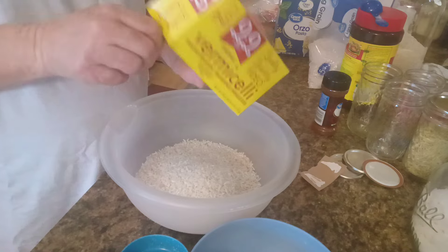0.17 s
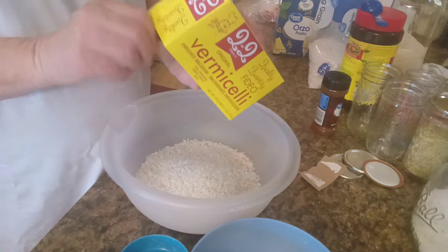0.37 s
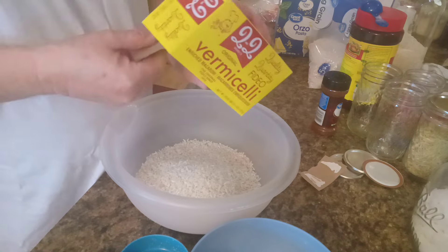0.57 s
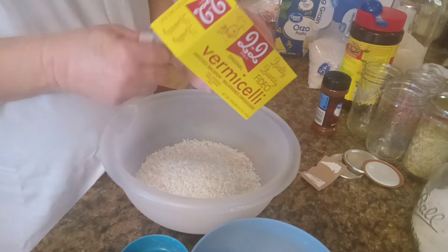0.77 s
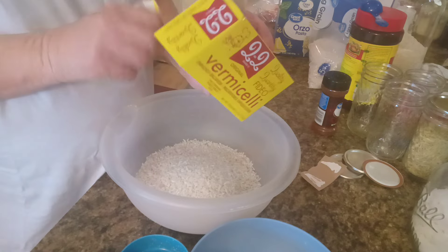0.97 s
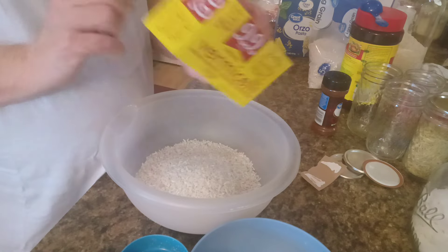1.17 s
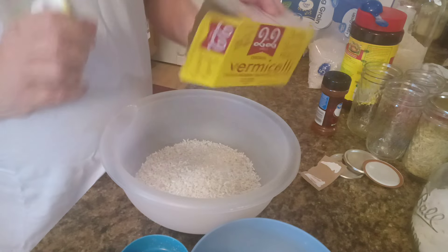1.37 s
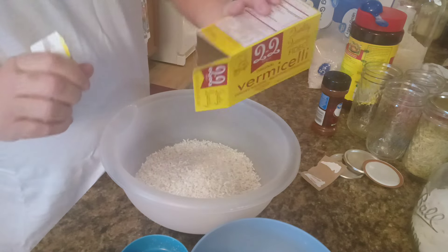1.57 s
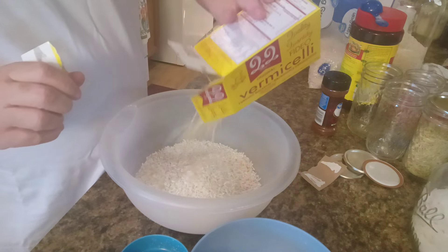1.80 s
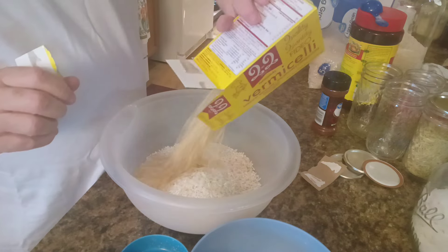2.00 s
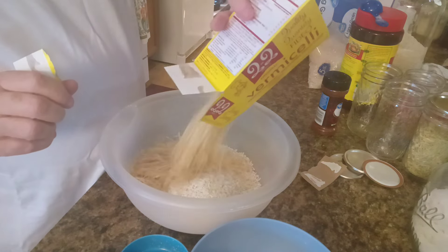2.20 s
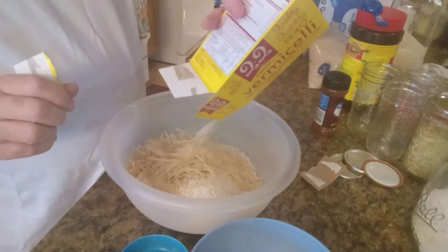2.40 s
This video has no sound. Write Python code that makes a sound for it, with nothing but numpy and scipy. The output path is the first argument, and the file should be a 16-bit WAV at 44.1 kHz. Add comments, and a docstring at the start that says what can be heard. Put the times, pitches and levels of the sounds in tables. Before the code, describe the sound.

Dry pasta pours from a carton onto a heap in a bowl, rattling briskly then thinning

```python
"""Dry pasta poured into a bowl

Short dry pasta is poured from a cardboard box onto a growing heap of pasta in a bowl, in a small kitchen,
over rumble and hum. Fingers rub, flap squeaks and jolts come first; then clumps knock, and the slide thins
to a patter on the heap. Coloured noise grains make the pasta and rubs, decaying modes the box wall,
unsteady sines the squeaks. Two spaced microphones hear it with their own lags, echoes and colours.
"""
import sys
import numpy as np
from scipy import signal
from scipy.fft import rfft, irfft
from scipy.io import wavfile
from scipy.ndimage import uniform_filter1d

SR = 44100
rng = np.random.default_rng(int(sys.argv[2]) if len(sys.argv) > 2 else 0)


def transcribe(signal):
    """Save signal, clipped to [-1, 1], as a 16-bit WAV file at the path in sys.argv[1]."""
    frames = np.atleast_2d(signal).T
    limited = np.clip(frames, -1, 1)
    pcm = np.round(limited * 32767).astype(np.int16)
    wavfile.write(sys.argv[1], SR, pcm)


N = 107956
T = np.arange(N) / SR

# colour of pasta against the box [f/Hz, level/dB]
BOX_TINT = [(100, -29.5), (230, -17), (300, -13.5), (480, -9), (650, 0.5), (810, 5.5), (1000, 1.5),
            (1150, 0.5), (1400, 1), (1700, -1), (2200, -1.5), (2550, 0), (2950, -2.5), (3700, 0),
            (4300, -1.5), (4700, -2.5), (6500, -2), (7700, -7.5), (9000, -13), (12000, -21), (15500, -45)]

JOLT_PER_S, BUMPS_PER_S = 3500, 800
UNEVEN_DB, UNEVEN_S = 0.4, 0.003  # slight unevenness of the flow: spread, averaging time
PLACES = 5
LEFT_LAG_S, BOWL_LAG_S, LAG_SPREAD_S = 0.0009363, 0.001133, 0.00016
EARLY_DB, EARLY_T60_S, EARLY_LOW_HZ = -3.5, 0.021, 735
ROOM_DB, ROOM_T60_S, ROOM_DAMP_HZ = -8.5, 0.19, 7040


def amp(db):
    """Decibels to gain."""
    return 10 ** (np.asarray(db) / 20)


def curve(rows):
    """Gain over time from (t/s, level/dB) points, -120 dB before the first."""
    s, db = np.array(rows).T
    return amp(np.interp(T, s, db, left=-120))


def unit(x):
    """Scale to an energy of one."""
    return x / np.sqrt(np.sum(x ** 2) + 1e-18)


def ring(x, impulse):
    """Convolve a signal, or each row of several, with an impulse response."""
    return signal.oaconvolve(np.atleast_2d(x), np.atleast_2d(impulse), axes=1)[:, :N]


def response(points, size=2048):
    """Minimum-phase impulse response of an (f/Hz, level/dB) colour, by folding its cepstrum."""
    hz, db = np.array(points, float).T
    f = np.maximum(np.fft.rfftfreq(size, 1 / SR), 1)
    gain = amp(np.interp(np.log(f), np.log(hz), db))
    cepstrum = irfft(np.log(gain))
    cepstrum[1:size // 2] *= 2
    cepstrum[size // 2 + 1:] = 0
    return irfft(np.exp(rfft(cepstrum)))


def tint(x, points):
    """Colour a signal with a unit-energy filter, which keeps the power of white noise."""
    return ring(x, unit(response(points)))


def strew(x, colour):
    """Give each sample, hence each impact, one of several places, and colour them all."""
    chosen = rng.integers(0, PLACES, N) == np.arange(PLACES)[:, None]
    return tint(x * chosen, colour)


def grains(per_s, scatter_db):
    """Random tiny impacts of uneven size and either sign, rms one."""
    hit = rng.random(N) < per_s / SR
    size = amp(scatter_db * np.clip(rng.standard_normal(N), -2, 2))
    return unit(hit * size * rng.choice([-1, 1], N)) * np.sqrt(N)


def burst(x, envelope):
    """Shape a train of impacts, keeping the energy of the envelope."""
    return unit(x * envelope) * np.sqrt(np.sum(envelope ** 2))


def swell(middle, half):
    """Smooth Gaussian rise and fall."""
    return np.exp(-((T - middle) / half) ** 2)


def blow(start, attack, decay):
    """Linear rise, exponential fall."""
    age = np.maximum(T - start, 0)
    return np.minimum(age / attack, 1) * np.exp(-np.maximum(age - attack, 0) / decay)


def wander(seconds):
    """Noise averaged over the given time, rms one."""
    noise = rng.standard_normal(N)
    return unit(uniform_filter1d(noise, max(int(seconds * SR), 1))) * np.sqrt(N)


def flutter(depth_db, seconds):
    """Unsteady gain of rms one."""
    return unit(amp(depth_db * wander(seconds))) * np.sqrt(N)


def floor():
    """Low room rumble, partly shared by both channels, with an appliance hum as a sine."""
    # colour of the rumble [f/Hz, level/dB]
    rumble_colour = [(25, -5), (50, -13), (75, 0), (110, -2), (180, 7), (300, -7), (600, -12), (2000, -20),
                     (4500, -9.5), (8000, -35), (15000, -52)]
    # common level of rumble and hum [t/s, level/dB]
    floor_level = [(0, -61.5), (.5, -60.5), (.65, -58.5), (1.5, -50.5), (2.2, -61), (2.45, -63.5)]
    hum_hz, hum_db = 76.2, -6.5  # peak, relative to the common level
    shared, *separate = tint(rng.standard_normal((3, N)), rumble_colour)
    hum = amp(hum_db) * np.sin(2 * np.pi * hum_hz * T)
    return (0.62 * shared + 0.5 * np.array(separate) + hum) * curve(floor_level)


def handling():
    """The box flexes dully in the hand as it is turned: coloured sparse grains."""
    # level of the flexing [t/s, level/dB]
    flex_level = [(.4, -59), (.6, -64), (.85, -60.5), (.93, -55), (1.05, -55), (1.25, -50), (1.48, -41),
                  (1.66, -56), (1.75, -76), (2.3, -71)]
    # colour of the flexing [f/Hz, level/dB]
    flex_colour = [(40, -9), (80, -14), (170, -1), (260, 4), (450, -5), (700, -18), (1500, -7),
                   (15000, -50)]
    return tint(grains(BUMPS_PER_S, scatter_db=4) * curve(flex_level), flex_colour)


def fingers():
    """Skin and flap catch and slip on the cardboard in swells of even grains."""
    # rubs on the cardboard [middle/s, half length/s, level/dB]
    rub_rows = [(.005, 0.054, -59), (.145, 0.038, -54.5), (0.399, 0.033, -47), (0.49, 0.037, -62),
                (0.613, 0.085, -59.5), (0.74, 0.02, -59.5), (0.896, 0.072, -47), (1.062, 0.014, -40),
                (1.171, 0.043, -41)]
    # colour of the rubs [f/Hz, level/dB]
    rub_colour = [(200, -12.5), (500, 3), (820, -4), (1200, -2.5), (1600, -7), (2500, -7), (3300, -5),
                  (4300, -5), (5200, -6.5), (6600, -6), (8000, -12), (11000, -22), (15500, -29.5)]
    envelope = sum(amp(db) * swell(s, half) for s, half, db in rub_rows)
    return strew(grains(per_s=900, scatter_db=0) * envelope, rub_colour)


def squeaks():
    """Stick and slip lock into a broken, unsteady tone that sags as the flap slows."""
    # drags of flap and fingers [middle/s, half length/s, f/Hz, level/dB]
    drag_rows = [(.01, 0.022, 5200, -58), (0.128, .02, 510, -48.5), (0.234, 0.0053, 1070, -31.5),
                 (.28, .025, 740, -43), (.35, 0.056, 1242, -48.5), (0.499, 0.0099, 821, -48),
                 (0.766, .03, 5340, -60.5), (.86, 0.044, 4550, -47.5), (0.992, 0.036, 4170, -38.5),
                 (1.045, 0.035, 3910, -39.5)]
    sag_per_s, jitter, jitter_s = 0.2, 0.039, 0.0007  # sag and jitter are fractions of the pitch
    wobble = wander(jitter_s)
    out = np.zeros(N)
    for s, half, hz, db in drag_rows:
        pitch_hz = hz * (1 - sag_per_s * (T - s) + jitter * wobble)
        phase = 2 * np.pi * np.cumsum(pitch_hz) / SR
        out += amp(db) * swell(s, half) * np.sin(phase)
    return out * flutter(depth_db=2.5, seconds=0.0092)


def thumps():
    """Fingers and load bump the wall, which rings hollow; longer contacts favour its low modes."""
    # bumps on the box wall [t/s, level/dB, contact time/s]
    bump_rows = [(.231, -15, 0.0035), (.469, -48.5, 0.00046), (0.576, -40, 0.0054), (.908, -14.5, 0.0024),
                 (1.2014, -9, 0.0003), (1.55, -16, .0003), (1.633, -25, 0.00044)]
    # box wall modes [f/Hz, level/dB, t60/s]
    wall_modes = [(120, -18.5, 0.045), (157, -21.5, 0.055), (213, -11, 0.03), (393, -13, 0.046),
                  (490, -6.5, 0.091), (697, 3.5, 0.032), (740, 4, 0.02), (810, 11, 0.023), (920, 2, 0.011),
                  (1220, 4, 0.015)]
    attack_s = 0.0019
    out = np.zeros(N)
    age = T[:SR // 5]
    for s, level_db, contact_s in bump_rows:
        wall = np.zeros(len(age))
        for hz, db, t60_s in wall_modes:
            gain = amp(db) / (1 + (hz * contact_s) ** 2)
            wall += gain * np.sin(2 * np.pi * hz * age) * np.exp(-np.log(1000) * age / t60_s)
        wall *= np.minimum(age / attack_s, 1)
        out += amp(level_db) * np.interp(T - s, age, wall, right=0) / 2
    return out


def jolts():
    """The contents jump, land together and settle: a short burst of grains plus a slower one."""
    # jolts [t/s, level/dB, settling level/dB, settling time/s]
    jolt_rows = [(0.227, -27, -30, 0.04), (0.57, -51.5, -52.5, 0.033), (0.9, -27.5, -28, 0.033)]
    # colour of the shaken contents [f/Hz, level/dB]
    jolt_colour = [(60, -22), (140, -7.5), (280, -17), (450, -1.5), (600, -8.5), (820, -0.5), (1100, -3.5),
                   (1600, -5), (2500, -5.5), (3000, -4.5), (4300, -5), (6500, -3.5), (8000, -11),
                   (11000, -19), (15500, -40)]
    pieces = grains(JOLT_PER_S, scatter_db=7.5)
    out = np.zeros(N)
    for s, db, settle_db, settle_s in jolt_rows:
        landing = amp(db) * blow(s, attack=0.0065, decay=0.0041)
        settling = amp(settle_db) * blow(s, attack=0.014, decay=settle_s)
        out += burst(pieces, landing + settling)
    return strew(out, jolt_colour)


def knocks():
    """Clumps of pasta strike the cardboard as the box tips, each a short burst of grains."""
    # clumps on the box wall [t/s, level/dB, decay/s]
    knock_rows = [(0.91, -24, 0.0014), (1.326, -15, 0.0019), (1.336, -18.5, 0.0031), (1.348, -10.5, 0.0018),
                  (1.352, -16, 0.0028), (1.371, -17.5, 0.0079), (1.47, -22, 0.0036), (1.489, -16, 0.0028),
                  (1.521, -17.5, 0.0033), (1.546, -10.5, 0.0067), (1.614, -12, 0.0024), (1.631, -7, 0.0036),
                  (1.655, -15, 0.0035)]
    pieces = grains(JOLT_PER_S, scatter_db=2.5)
    out = sum(burst(pieces, amp(db) * blow(s, attack=0.002, decay=decay_s)) for s, db, decay_s in knock_rows)
    return strew(out, BOX_TINT)


def ticks():
    """Single hard pieces click, each a very short noise burst."""
    # clicks of single pieces [t/s, level/dB]
    tick_rows = [(.329, -50), (0.468, -48.5), (.91, -42), (1.198, -13.5), (1.351, -11.5), (1.426, -21),
                 (1.435, -21), (1.636, -18), (2.315, -22.5), (2.338, -21.5), (2.399, -25.5)]
    # colour of the clicks [f/Hz, level/dB]
    tick_colour = [(300, -18), (900, -12), (2000, 20), (3500, -1.5), (6800, 24.5), (9500, 5.5), (12000, -7),
                   (15500, -40)]
    contact = rng.standard_normal(N)
    out = sum(burst(contact, amp(db) * blow(s, attack=0.00073, decay=0.00086)) for s, db in tick_rows)
    return strew(out, tick_colour)


def spout():
    """Late pieces drum through the opening of the box in short swells of near-even grains."""
    # drumming on the spout [middle/s, half length/s, level/dB]
    drum_rows = [(2.199, 0.011, -25), (2.222, 0.0063, -17), (2.237, 0.0051, -19.5)]
    # colour of the spout [f/Hz, level/dB]
    spout_colour = [(300, -33), (1200, -22.5), (1530, 8), (1730, 5.5), (2100, -5.5), (3000, -11),
                    (4300, -7), (6200, -4), (8000, -18), (15000, -53)]
    pieces = grains(per_s=1100, scatter_db=0.5)
    out = sum(burst(pieces, amp(db) * swell(s, half)) for s, half, db in drum_rows)
    return strew(out, spout_colour)


def stream():
    """Pieces patter densely and steadily on the heap in the bowl."""
    # pasta landing on the heap [t/s, level/dB]
    landing_level = [(1.6, -45), (1.72, -24), (1.85, -24.5), (2.05, -22.5), (2.14, -26), (2.2, -30.5),
                     (2.25, -32), (2.3, -33.5), (2.37, -36.5), (2.45, -34.5)]
    # colour of the heap [f/Hz, level/dB]
    heap_colour = [(150, -37), (400, -14.5), (640, -19), (810, -15), (1000, -12.5), (1300, -12.5),
                   (1550, 1.5), (2000, -3), (2700, -5), (3600, -3), (5000, -4), (6800, -3), (8000, -10.5),
                   (9000, -10), (11000, -17.5), (15500, -40)]
    flow = curve(landing_level) * flutter(UNEVEN_DB, UNEVEN_S)
    return strew(grains(per_s=3000, scatter_db=6) * flow, heap_colour)


def slide():
    """Pieces scrape down the box in a fine rattle while sparser bumps sound the wall below it."""
    # pasta sliding along the cardboard [t/s, level/dB]
    slide_level = [(1.03, -61), (1.07, -41.5), (1.14, -45.5), (1.19, -32), (1.215, -26.5), (1.31, -30.5),
                   (1.37, -24.5), (1.41, -30), (1.46, -33.5), (1.5, -25.5), (1.54, -23.5), (1.56, -21),
                   (1.66, -19), (1.75, -23), (1.86, -19), (2.0, -22), (2.115, -22), (2.16, -37.5),
                   (2.26, -40.5), (2.45, -56)]
    split_hz = 1760
    low = signal.butter(2, split_hz, "low", fs=SR, output="sos")
    high = signal.butter(2, split_hz, "high", fs=SR, output="sos")
    flow = curve(slide_level) * flutter(UNEVEN_DB, UNEVEN_S)
    bumps = strew(grains(BUMPS_PER_S, scatter_db=4) * flow, BOX_TINT)
    rattle = strew(grains(per_s=4000, scatter_db=5.5) * flow, BOX_TINT)
    return signal.sosfilt(low, bumps + 1e-18) + signal.sosfilt(high, rattle + 1e-18)


def hollow(places):
    """The part-filled box adds a few narrow resonances to the direct rattle."""
    # box resonances [f/Hz, width/Hz, level re direct/dB]
    box_modes = [(782, 29, -13), (1195, 25, -15.5), (1520, 25, -32), (3650, 64, -7), (4303, 76, 3),
                 (4670, 61, -6), (6030, 240, -19)]
    out = places
    for hz, width_hz, db in box_modes:
        b, a = signal.iirpeak(hz, hz / width_hz, SR)
        out = out + amp(db) * signal.lfilter(b, a, places + 1e-18)
    return out


def path(delay_s, early_db, room_db):
    """Place to microphone: direct impulse, early echoes off nearby surfaces, short room tail."""
    t = T[:SR // 3]
    early, tail = rng.standard_normal((2, len(t)))
    early = early * (t > delay_s + 0.0003) * np.exp(-np.log(1000) * t / EARLY_T60_S)
    # small surfaces reflect little bass
    early = unit(signal.sosfilt(signal.butter(1, EARLY_LOW_HZ, "high", fs=SR, output="sos"), early))
    tail = signal.sosfilt(signal.butter(1, ROOM_DAMP_HZ, fs=SR, output="sos"), tail)
    tail = unit(tail * np.minimum(t / 0.011, 1) * np.exp(-np.log(1000) * t / ROOM_T60_S))
    impulse = amp(early_db) * early + amp(room_db) * tail
    impulse[int(abs(delay_s) * SR)] += 1
    return unit(impulse)


def kitchen(places, lag_s, early_db, room_db):
    """Each place has its own echoes and reaches the left microphone a little later than the right."""
    offsets = np.linspace(-1, 1, len(places) + 2)[1:-1]
    left_delays = lag_s + LAG_SPREAD_S * offsets
    right_delays = np.zeros(len(places))
    channels = []
    for delays in (left_delays, right_delays):
        paths = np.array([path(delay_s, early_db, room_db) for delay_s in delays])
        channels.append(ring(places, paths).sum(axis=0))
    return np.array(channels)


def scene():
    """Box and bowl sounds, each with its own lag to the left, low-cut and laid over the room floor."""
    in_box = hollow(slide() + jolts() + knocks() + fingers())
    contents = kitchen(amp(-1.0) * in_box + spout(), LEFT_LAG_S, EARLY_DB, ROOM_DB)
    cardboard = kitchen(handling() + thumps() + squeaks(), LEFT_LAG_S, early_db=-24, room_db=-12)
    bowl = kitchen(stream() + ticks(), BOWL_LAG_S, EARLY_DB, ROOM_DB)
    low_cut = signal.butter(3, 77, "high", fs=SR, output="sos")
    return signal.sosfilt(low_cut, contents + cardboard + bowl) + floor()


def record(dry):
    """Left microphone louder but duller than the right; highest peaks rounded, top cut."""
    # left minus right sensitivity [f/Hz, difference/dB]
    balance = [(60, 12), (110, 3.5), (200, 3.5), (380, 2), (750, 8.5), (1290, 4), (1800, 5.5), (2500, 3),
               (4300, 10.5), (6600, 9.5), (7800, -1.5), (9000, -10.5), (11500, -10.5), (15000, -27)]
    ceiling, top_hz = 0.85, 15900
    # half the difference to each side
    microphones = np.array([response([(hz, sign * db / 2) for hz, db in balance]) for sign in (1, -1)])
    x = ring(dry, microphones)
    x = x / (1 + (x / ceiling) ** 6) ** (1 / 6)
    return signal.sosfilt(signal.ellip(10, 0.2, 80, top_hz, fs=SR, output="sos"), x)


dry = scene()
out = record(dry)
transcribe(out)
```